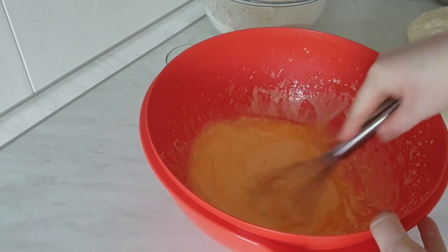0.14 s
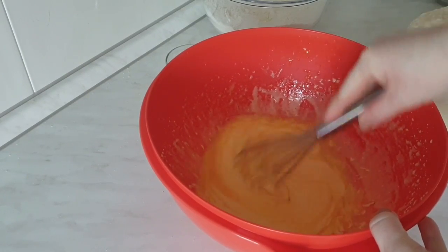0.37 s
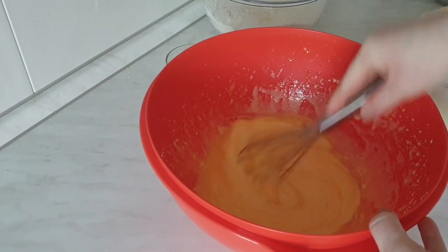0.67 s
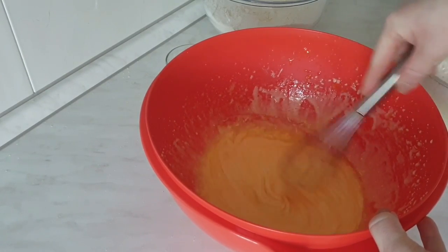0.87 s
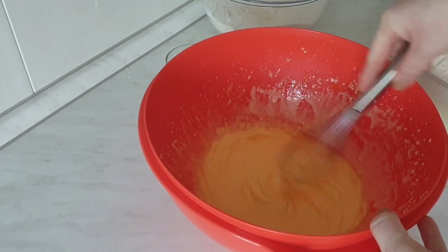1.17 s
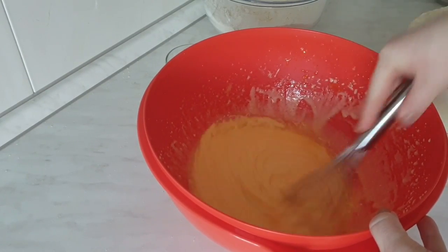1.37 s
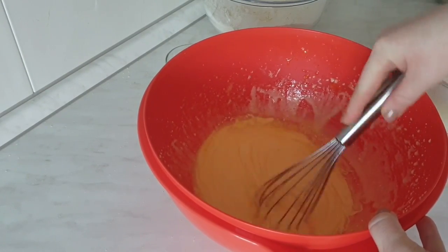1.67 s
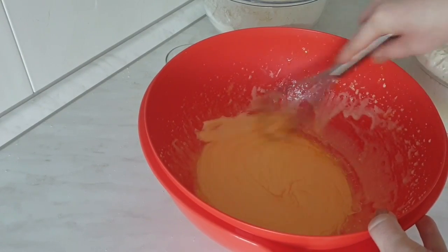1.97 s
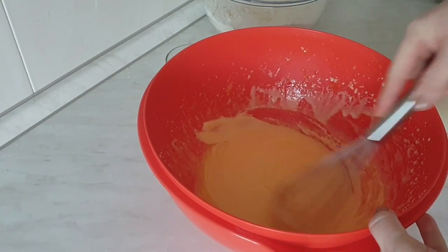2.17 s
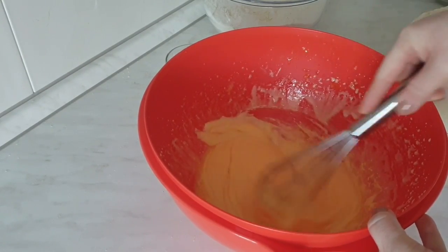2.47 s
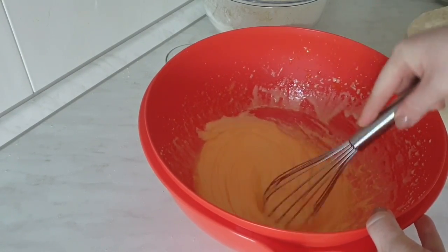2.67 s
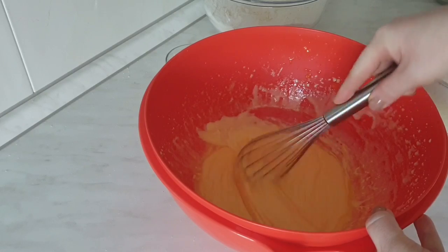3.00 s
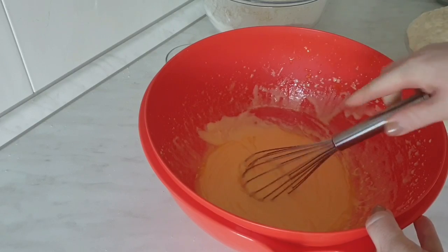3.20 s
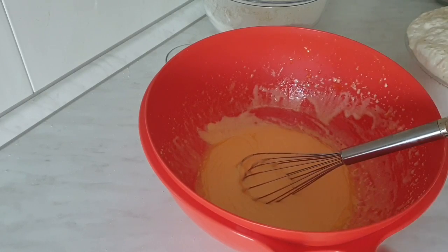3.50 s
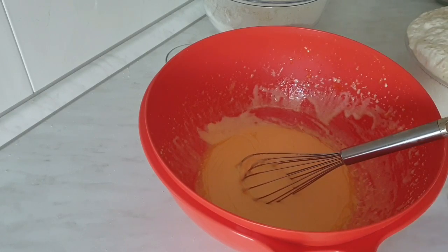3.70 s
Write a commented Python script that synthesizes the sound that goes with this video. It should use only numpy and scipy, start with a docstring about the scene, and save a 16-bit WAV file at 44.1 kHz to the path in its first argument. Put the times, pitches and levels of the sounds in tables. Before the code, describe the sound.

A wire whisk swishes and scrapes in a plastic bowl of batter, then clacks onto the rim

```python
"""Whisk in a plastic bowl

A wire whisk beats batter in a plastic bowl on a kitchen counter: it circles, then scrapes in single strokes.
The rub is coloured noise from dense random slips, with a wall echo, ticking wires and hoarse singing.
Bumps on the wall and knocks of the dropped handle on the rim excite decaying modes and short noise cracks.
The counter hums after the knocks, a small hard room rings on as decaying noise, and a quiet noise stays."""
import sys
import numpy as np
from scipy import signal
from scipy.fft import rfft, irfft, next_fast_len
from scipy.io import wavfile
from scipy.ndimage import uniform_filter1d, map_coordinates

SR = 44100
rng = np.random.default_rng(int(sys.argv[2]) if len(sys.argv) > 2 else 0)


def linear_from_db(decibels):
    """Turn decibels (scalar or array-like) into linear amplitude factors; 0 gives 1."""
    return 10 ** (np.asarray(decibels, float) / 20)


def store_pcm(level_fs):
    """Save levels as 16-bit WAV."""
    pcm = np.round(np.clip(level_fs, -1, 1) * 32767).astype(np.int16)
    wavfile.write(sys.argv[1], SR, np.atleast_2d(pcm).T)


N = 169785

# level of the wires rubbing the wall while circling: time_s, rub_db
CIRCLING = [(0, -39), (0.148, -41), (.274, -33.5), (.33, -44), (0.391, -36.5), (.43, -42), (.47, -36),
            (.58, -34), (.656, -39), (0.717, -35), (0.823, -32.5), (.904, -33.5), (0.95, -41),
            (1.032, -28.5), (1.077, -31.5), (1.168, -30.5), (1.242, -38), (1.361, -29.5), (1.41, -29.5),
            (1.524, -35), (1.658, -33.5), (1.699, -30), (1.737, -34)]
# the handle touches the rim, later falls on it and bounces: time_s, strength_db, base_mode_re_strength_db,
# favoured_hz
KNOCKS = [(3.096, -28.5, -5.5, 450), (3.382, -6.5, -7.5, 900), (3.397, -17.5, 2.5, 415),
          (3.435, -17, -4, 786)]


def rms_one(x):
    """Normalises mean power: scales to rms 1."""
    return x / np.sqrt(np.mean(x ** 2) + 1e-20)


def at_hz(points, hz):
    """Interpolates a table linearly on a log-frequency axis."""
    return np.interp(np.log(hz), np.log(np.array(points)[:, 0]), np.array(points)[:, 1])


def drift(rate_hz):
    """Low-passed noise: slow chance of rms 1, from two equal poles at rate_hz."""
    step = 40   # samples between slow values
    r = np.exp(-2 * np.pi * step * rate_hz / SR)
    white = rng.standard_normal(N // step + 2002)
    slow = signal.lfilter([1], [1, -2 * r, r * r], white)[2000:]   # settled part
    return np.interp(np.arange(N) / step, np.arange(len(slow)), rms_one(slow))


def colour(x, spectrum):
    """Linear filtering: weights the spectrum of x by a table in dB that falls away outside its ends."""
    size = next_fast_len(x.shape[-1])
    hz = np.arange(size // 2 + 1) * SR / size + 1
    points = [(1, -90)] + list(spectrum) + [(SR / 2, -90)]
    return irfft(rfft(x, size) * linear_from_db(at_hz(points, hz)), size)[..., :x.shape[-1]]


def ring(x, hz, t60):
    """Damped resonance: a unit click sets a sine of initial height 1 ringing, down 60 dB after t60 seconds."""
    r, w = linear_from_db(-60 / (t60 * SR)), 2 * np.pi * hz / SR
    return signal.lfilter([0, np.sin(w)], [1, -2 * r * np.cos(w), r * r], x + 1e-18)


def swelling_ring(x, hz, t60, rise_s):
    """Finite contact time: subtracting a quickly damped twin makes the mode swell with time constant rise_s."""
    return ring(x, hz, t60) - ring(x, hz, rise_s * np.log(1000))


def rub_levels():
    """Sliding contact: amplitudes of the bright rub and the duller wall sound, stroke by stroke."""
    # one long single stroke: time_s, rub_db, wall_re_rub_db
    long_stroke = [(1.943, -45, 2.5), (1.975, -43, 3.5), (2.034, -27.5, -8), (2.073, -18.5, -19),
                   (2.143, -25.5, -15), (2.199, -30.5, -6), (2.226, -38.5, -4.5)]
    # short single strokes, one table each: time_s, rub_db, wall_re_rub_db
    short_strokes = [
        [(2.402, -35.5, -1), (2.43, -31.5, -3.5), (2.5, -39, -7)],
        [(2.686, -38.5, 1), (2.712, -34.5, -3), (2.745, -38, 1)],
        [(2.946, -37, 7.5), (2.958, -28.5, -11), (2.99, -33, -7)],
        [(3.136, -43, 11.5), (3.142, -38, -7.5), (3.19, -51, 16)],
        [(3.295, -73.5, 25.6), (3.378, -67, 14.4)],
        [(3.762, -69, 3), (3.796, -64.5, 0), (3.85, -69, 1)],
    ]
    edge_s = 0.0022   # wires touch down and lift off
    mean_wall_db, wall_follows = -40, 0.83   # while circling: level at mean rub, share of the rub's swing
    t, rub, wall = np.arange(N) / SR, np.zeros(N), np.zeros(N)
    s, rub_db = np.transpose(CIRCLING)
    wall_db = mean_wall_db + wall_follows * (rub_db - rub_db.mean())
    circling = np.transpose([s, rub_db, wall_db - rub_db])
    for rows in [circling, long_stroke, *short_strokes]:
        s, rub_db, wall_re_rub_db = np.transpose(rows)
        touch = np.clip(np.minimum(t - s[0], s[-1] - t) / edge_s + 1, 0, 1)
        rub += touch * linear_from_db(np.interp(t, s, rub_db))
        wall += touch * linear_from_db(np.interp(t, s, rub_db + wall_re_rub_db))
    return rub, wall


def rubbing():
    """Stick-slip friction: dense uneven slips drive bright hiss, a duller wall sound and resonances."""
    # spectrum of the bright rub: pitch_hz, relative_db_per_hz
    rub_spectrum = [(900, -36), (1500, -4), (3000, 2.5), (4900, -3.5), (7800, -4), (14800, -10),
                    (16000, -36.5)]
    # spectrum of the duller wall sound: pitch_hz, relative_db_per_hz
    wall_spectrum = [(60, -37.5), (124, -26), (216, -4.5), (354, 5), (650, 0), (1160, 5.5), (2400, -7.5)]
    slips_per_s, slip_spread_db = 14000, 2.2   # rate in each of mid and side; scale of exponential spread
    rub, wall = rub_levels()
    slips = (rng.random((2, N)) < slips_per_s / SR) * rng.choice([-1, 1], (2, N))
    slips = rms_one(slips * linear_from_db(slip_spread_db * np.minimum(rng.exponential(1, (2, N)), 5)))
    bright = rub * rms_one(far_wall(colour(slips, rub_spectrum)))
    dull = wall * rms_one(colour(slips[::-1], wall_spectrum))
    return bright + dull + rattling(np.minimum(wall, rub)) + rub_resonances(slips * wall)


def rub_resonances(force):
    """Band-pass resonance: wires and wall ring under the rub, each at a level that comes and goes."""
    # ringing of wires and wall: pitch_hz, width_hz, drive_db
    peaks = [(126.4, 28, -17.5), (466, 96, -14.5)]
    swing_db, swing_hz = 3.5, 14.0   # rms swing, drift rate
    out = np.zeros((2, N))
    for hz, width_hz, db in peaks:
        drive = force * linear_from_db(db + swing_db * drift(swing_hz))
        r = np.exp(-np.pi * width_hz / SR)
        gain = np.sqrt(1 - r * r)
        poles = [1, -2 * r * np.cos(2 * np.pi * hz / SR), r * r]
        out += signal.lfilter([gain, 0, -gain], poles, drive + 1e-18)
    return out


def far_wall(x):
    """Comb interference: a dull echo half a cycle late cancels a pitch, which wanders while circling."""
    # echo off the far wall of the bowl: time_s, cancelled_hz, echo_db
    cancelled = [(1.979, 3970, -15), (2.09, 3420, -1), (2.3, 2930, -13)]
    wander_octaves = 0.34   # rms
    t, (s, hz, db) = np.arange(N) / SR, np.transpose(cancelled)
    hz = np.interp(t, s, hz) * 2 ** (wander_octaves * drift(3.0) * (t < CIRCLING[-1][0]))
    late = np.arange(N) - SR / (2 * hz)
    dull = uniform_filter1d(x, size=4)
    echo = np.array([map_coordinates(c, [late], order=1) for c in dull])
    return x + linear_from_db(np.interp(t, s, db)) * echo


def rattling(drive):
    """Impulsive excitation: wires tick together in clumps, each tick ringing briefly at one of 12 pitches."""
    ticks_per_s, clump_db = 300, 6.5   # rate per pitch in each of mid and side where the drift is zero; its swing
    level_db, cycles_t60 = 3, 31   # rms over drive; cycles to fall by 60 dB
    sizes = linear_from_db(5.5 * np.minimum(rng.exponential(1, (2, N)), 5)) * rng.choice([-1, 1], (2, N))
    chance = rng.random((2, N)) * SR / ticks_per_s
    out = np.zeros((2, N))
    for k, hz in enumerate(np.geomspace(1900, 4390, num=12)):
        # shifting one set of draws gives each pitch ticks at other moments
        born = np.roll(chance, 997 * k, axis=1) < linear_from_db(clump_db * drift(10.0))
        out += ring(sizes * born, hz, cycles_t60 / hz)
    return linear_from_db(level_db) * drive * rms_one(out)


def singing():
    """Narrow-band noise on carriers: one climbs through the long stroke, others flare and fade."""
    # the wires sing hoarsely through the long stroke: time_s, pitch_hz, level_db
    sing = [(1.951, 1378, -35.5), (2.041, 1438, -28.5), (2.159, 1690, -31.5)]
    # a wire or the wall rings out briefly: start_s, pitch_hz, peak_db
    flares = [(1.015, 440, -41), (1.02, 3140, -32), (1.39, 4100, -36), (2.687, 700, -39.5),
              (2.962, 542, -38.5)]
    width_hz, flare_rise_s = 320, 0.014   # noise bandwidth; time from start to peak
    t, (s, hz, db) = np.arange(N) / SR, np.transpose(sing)
    low_pass = signal.butter(2, width_hz / 2, fs=SR, output="sos")
    wobble = rms_one(signal.sosfilt(low_pass, rng.standard_normal((2, 2, N))))
    wobble = wobble[0] + 1j * wobble[1]
    phase = 2 * np.pi * np.cumsum(np.interp(t, s, hz)) / SR
    out = np.exp(1j * phase) * linear_from_db(np.interp(t, s, db)) * (t > s[0]) * (t < s[-1])
    for start_s, hz, db in flares:
        age = np.maximum(t - start_s, 0) / flare_rise_s
        out += np.exp(2j * np.pi * hz * t + 1 - age) * age * linear_from_db(db)
    return np.real(wobble * out)


def blows(rows, crack_db, rise_s, fall_db):
    """Modal synthesis: each blow excites the bowl modes, most those near its favoured pitch, and cracks.

    fall_db is per octave away from the favoured pitch."""
    # lowest mode of the bowl: pitch_hz, gain_db, t60_s
    base_mode = (133.4, -0.69, 0.056)
    # higher modes of the bowl wall: pitch_hz, gain_db, t60_s
    wall_modes = [(275, -1, 0.078), (345.8, 1, 0.098), (414.7, -1.5, .1), (522, 4, 0.03), (700, -8, 0.074),
                  (944, 5, .022), (1233, 0, 0.024)]
    # spectrum of the crack: pitch_hz, relative_db_per_hz
    crack_spectrum = [(150, -17), (900, -4), (1900, -8.5), (3600, -30), (8000, -22.5), (14400, -25)]
    mode_spread_db, crack_t60_s = 2.0, 0.031
    crack_fall_db = 18.5   # per octave of the favoured pitch below the top mode
    s, db, base_db, favoured_hz = np.transpose(rows)
    at, out = (s * SR).astype(int), np.zeros((2, N))
    luck_db = rng.normal(0, mode_spread_db, (len(s), len(wall_modes) + 1, 2))
    for k, (hz, mode_db, t60) in enumerate([base_mode] + wall_modes):
        near_db = -fall_db * np.abs(np.log2(hz / favoured_hz)) if k else base_db
        signs = [[(-1) ** k], [(-1) ** (k // 2)]]   # polarity of the mode in mid and side
        clicks = np.zeros((2, N))
        clicks[:, at] = linear_from_db(db + near_db + mode_db + luck_db[:, k].T) * signs
        out += swelling_ring(clicks, hz, t60, rise_s)
    clicks = np.zeros(N)
    clicks[at] = linear_from_db(db + crack_db - crack_fall_db * np.log2(wall_modes[-1][0] / favoured_hz))
    dying = signal.lfilter([1], [1, -linear_from_db(-60 / (crack_t60_s * SR))], clicks + 1e-18)
    return out + dying * rms_one(colour(rng.standard_normal((2, N)), crack_spectrum))


def counter():
    """Low structural resonance: each knock sets the counter humming, slow to swell and slow to fade."""
    clicks = np.zeros(N)
    for s, db, *_ in KNOCKS:
        clicks[int(s * SR)] = linear_from_db(db - 26)   # drive below the knock, dB
    return swelling_ring(clicks, 77.2, t60=0.53, rise_s=0.045) * [[1], [0]]   # mid only


def kitchen(x):
    """Diffuse reverberation: convolves with noise that decays band by band from the first wall's delay."""
    # decay of the room: pitch_hz, t60_s
    room_t60 = [(100, 0.3), (400, 0.38), (3000, 0.37), (14000, 0.24)]
    # band limits for the decaying noise: edge_hz
    edges_hz = 40 * 2 ** np.arange(0, 8.8, .5)
    echo_db, first_wall_s = -4.5, 0.0037
    t, echo = np.arange(SR) / SR, 0
    white = rng.standard_normal((2, 2, SR))
    for k, (low, high) in enumerate(zip(edges_hz, edges_hz[1:])):
        band_pass = signal.butter(2, [low, high], "band", fs=SR, output="sos")
        band = signal.sosfilt(band_pass, white[k % 2])
        dying = linear_from_db(-60 * t / at_hz(room_t60, np.sqrt(low * high)))
        echo = echo + band * dying / np.sqrt(np.sum(dying ** 2))
    echo = np.pad(echo, ((0, 0), (int(first_wall_s * SR), 0)))
    return linear_from_db(echo_db) * signal.fftconvolve(x[None], echo, axes=1)[:, :N]


def room_quiet():
    """Stationary coloured noise: the quiet of the room."""
    # spectrum of the quiet: pitch_hz, relative_db_per_hz
    floor = [(120, 8.5), (400, -11), (940, -11.5), (1500, -36.5), (16000, -29)]
    return linear_from_db(-64) * rms_one(colour(rng.standard_normal((2, N)), floor))


def spread(mid, side):
    """Interchannel coherence: mixes mid and side into left and right, alike in the bass, unlike in the treble."""
    # likeness of left and right: pitch_hz, coherence (no unit)
    likeness = [(150, 0.95), (280, 0.91), (600, 0.46), (1500, 0.038)]
    # balance: pitch_hz, left_over_right_db
    left_db = [(130, 2.5), (250, 0.5), (600, 0.7), (5000, 1)]
    size = next_fast_len(len(mid))
    hz = np.arange(size // 2 + 1) * SR / size + 1
    alike = np.clip(at_hz(likeness, hz), 0, 1)
    m = rfft(mid, size) * np.sqrt((1 + alike) / 2)
    s = rfft(side, size) * np.sqrt((1 - alike) / 2)
    tilt = linear_from_db(at_hz(left_db, hz) / 2)
    return irfft(np.array([(m + s) * tilt, (m - s) / tilt]), size)[:, :len(mid)]


def scene():
    """Superposition: sums rub, blows, echoes of their mid signal, counter and quiet, then spreads them."""
    # the whisk bumps the wall: time_s, strength_db, base_mode_re_strength_db, favoured_hz
    bumps = [(.103, -29, -20, 438), (.174, -28.5, -32, 313), (.772, -22, -11, 350),
             (1.071, -23.5, -2.5, 332), (1.347, -28, 4.5, 910), (1.654, -19.5, -4, 380),
             (1.897, -43, 3.5, 500), (2.056, -26, 15.5, 291), (2.388, -27, -8, 1070),
             (2.897, -23.5, -12, 954), (3.14, -48, 24, 423)]
    bowl = rubbing() + singing()
    bowl = bowl + blows(bumps, crack_db=0, rise_s=0.003, fall_db=33.5)
    bowl = bowl + blows(KNOCKS, crack_db=4, rise_s=0.0006, fall_db=10.5)
    mid, side = bowl + kitchen(bowl[0]) + counter() + room_quiet()
    return spread(mid, side)


def roll_off(x):
    """The treble ends steeply here."""
    return signal.sosfilt(signal.butter(12, 16670, fs=SR, output="sos"), x)


def record(dry):
    """High-pass response: small microphones lose the deep bass."""
    high_pass = signal.butter(4, 60.4, "high", fs=SR, output="sos")   # corner in Hz
    mix = signal.sosfilt(high_pass, dry)
    return roll_off(mix)


dry = scene()
out = record(dry)
store_pcm(out)
```